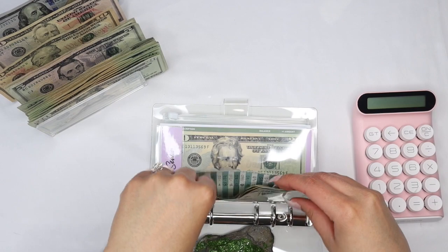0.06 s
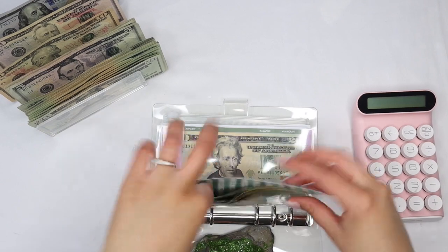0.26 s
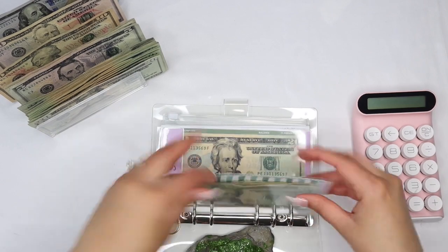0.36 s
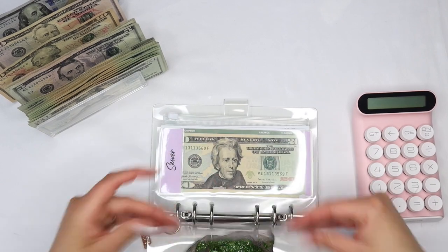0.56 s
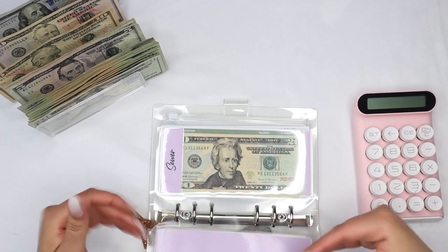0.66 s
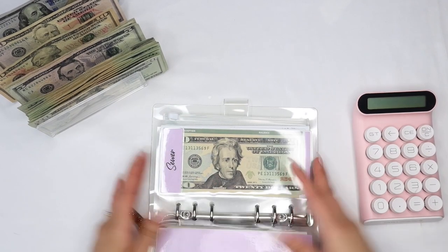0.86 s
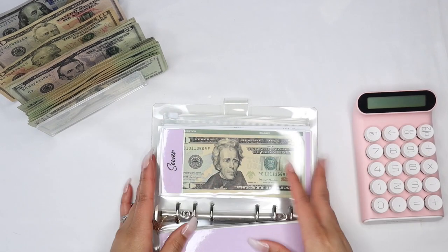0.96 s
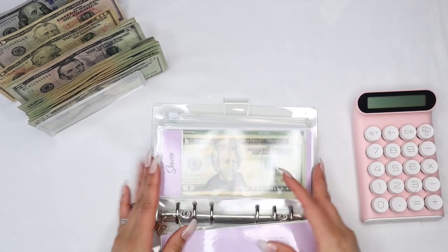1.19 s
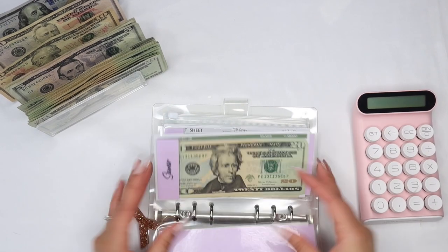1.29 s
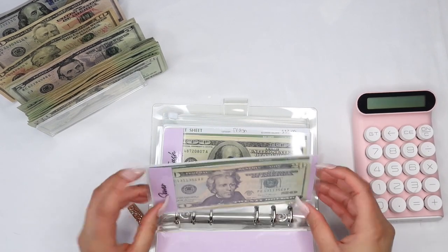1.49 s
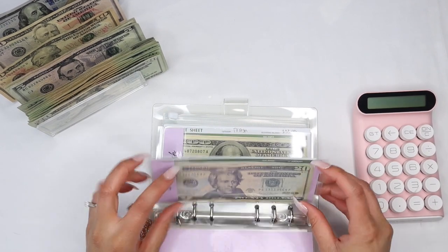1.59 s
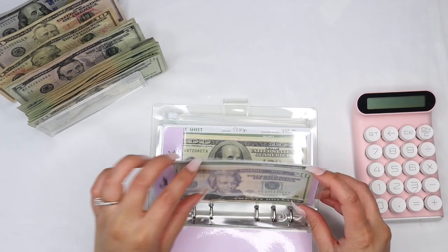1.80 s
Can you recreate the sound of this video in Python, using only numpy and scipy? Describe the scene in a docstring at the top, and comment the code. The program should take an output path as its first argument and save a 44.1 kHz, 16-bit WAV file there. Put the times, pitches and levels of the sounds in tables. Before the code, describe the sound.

Close stereo sound of hands leafing through plastic pockets of paper money: faint ticks, a busy burst of snaps, flaps and bumps, a brief quiet, then a gentler crinkling run in a small room.

```python
"""Hands leaf through stiff plastic binder pockets holding paper banknotes, on a table close under a stereo microphone.
Faint film ticks lead into snapping creases, flapping pockets and table thumps, hardest on a crack near 0.43 s.
The grainy sliding nearly fades out after 1 s; a softer run of snaps, flaps and rustle follows from about 1.25 s.
Filtered noise bursts make nearly all of it and a dying sine the crack; a small quiet room answers throughout."""
import sys
import numpy as np
from scipy import signal
from scipy.fft import rfft, irfft, next_fast_len
from scipy.io import wavfile

SR = 44100
rng = np.random.default_rng(int(sys.argv[2]) if len(sys.argv) > 2 else 0)


def rack_gain(trim_db):
    """Turn a fader trim in dB into the linear factor to multiply a signal by."""
    fader = np.asarray(trim_db, float)
    return 10 ** (fader / 20)


def to_wav(sig):
    """Store sig (one row per channel, or 1-D mono) as 16-bit WAV at the path in sys.argv[1].

    Samples outside -1..1 are clipped; the rate is SR.
    """
    pcm = np.clip(np.atleast_2d(sig), -1, 1) * 32767
    pcm = np.round(pcm).astype(np.int16)
    wavfile.write(sys.argv[1], SR, pcm.T)  # frames by channels


N = 81585  # samples, 1.85 s
CREASE_Q = 1.8  # resonance of creases and crinkles
CREASE_RISE = 0.076  # rise time constant as a share of the nominal decay constant


def along(points, hz):
    """Read a curve of (Hz, value) points on a log frequency axis."""
    point_hz, value = np.transpose(points)
    return np.interp(np.log(hz + 1), np.log(point_hz + 1), value)


def filtered(x, response):
    """Shape the spectrum of x by a gain that depends on frequency."""
    size = next_fast_len(x.shape[-1] + 8192)
    spectrum = rfft(x, size) * response(np.fft.rfftfreq(size, 1 / SR))
    return irfft(spectrum, size)[..., :x.shape[-1]]


# likeness of the two channels, 1 = identical, below 0 = opposed: pitch_hz, correlation
STEREO_LIKENESS = [(60, 1), (910, 0.95), (3570, 0.22), (13900, -0.51)]


def pair(shape, colour):
    """Left-right noises of rms 1 with a colour, alike in the bass and less so above."""
    def mid_side_gain(hz):
        angle = np.arccos(np.clip(along(STEREO_LIKENESS, hz), -1, 1)) / 2
        return np.array([colour(hz) * np.cos(angle), colour(hz) * np.sin(angle)])

    mid, side = filtered(rng.standard_normal((2, *shape)), mid_side_gain)
    both = np.array([mid + side, mid - side])
    return both / np.sqrt(np.mean(both ** 2, axis=(0, -1), keepdims=True))


def resonance(hz, centre_hz, q):
    """Gain of a resonance applied twice."""
    return 1 / (1 + (q * (hz / centre_hz - centre_hz / (hz + 1))) ** 2)


def bursts(start_s, level_db, colour, t60_s, rise_s, size):
    """Coloured noise bursts that rise fast and die away, laid at their times."""
    t = np.arange(size) / SR
    envelope = (1 - np.exp(-t / np.abs(rise_s))) * rack_gain(-60 * t / np.abs(t60_s)[:, None])
    envelope = envelope / envelope.max(1)[:, None]
    gain = rack_gain(level_db - 5.5)[:, None]  # leaves headroom for the noise's own peaks
    rows = pair((len(level_db), size), colour) * envelope * gain
    out = np.zeros((2, N + size))
    for k, s in enumerate(start_s):
        out[:, round(s * SR):][:, :size] += rows[:, k]
    return out[:, :N]


# colour of the room's hush: pitch_hz, gain_db (relative)
HUSH_COLOUR = [(25, -28), (250, 5), (1500, -1), (3000, -7.5), (9000, -25)]


def hush():
    """Steady noise under everything, heaviest in the low end."""
    return rack_gain(-82) * pair((N,), lambda hz: rack_gain(along(HUSH_COLOUR, hz)))  # dB rms


# how long the room rings: pitch_hz, t60_s
ROOM_DECAY = [(200, 0.18), (2000, 0.39), (10000, 0.06)]


def room(x):
    """Convolve with a noise tail in which each frequency dies at its own speed."""
    hz, t, grains = signal.stft(rng.standard_normal((2, SR // 2)), SR, nperseg=256)
    decay = rack_gain(-60 * t / along(ROOM_DECAY, hz)[:, None])
    tail = signal.istft(grains * decay, SR, nperseg=256)[1]
    padded = np.pad(x, ((0, 0), (200, 0)))  # the room answers 200 samples late
    return signal.fftconvolve(padded, tail / np.linalg.norm(tail[0]), axes=1)[:, :N]


# the binder bumps the table: start_s, level_db (nominal peak), t60_s
THUMP_HITS = [(.21, -40.5, 0.16), (.325, -51, 0.16), (.385, -34.5, 0.28), (0.434, -31.5, 0.32),
              (.548, -34, 0.32), (.726, -39, 0.34), (0.826, -40, 0.13), (.963, -46, 0.15),
              (1.499, -43.5, 0.28), (1.655, -40.5, 0.19)]
# colour of the table under the binder: pitch_hz, gain_db (relative)
TABLE_COLOUR = [(40, -43.5), (110, -17), (170, -4.5), (400, -2), (700, -9), (2500, -81.5)]


def thumps():
    """The table thumps under the binder: low noise bursts with a quick rise."""
    start_s, level_db, t60_s = np.transpose(THUMP_HITS)
    colour = lambda hz: rack_gain(along(TABLE_COLOUR, hz))[None]
    return bursts(start_s, level_db, colour, t60_s, rise_s=0.0026, size=12000)


# pockets flexing: start_s, level_db (nominal peak), pitch_hz, t60_s
POCKET_FLAPS = [(0.171, -50, 760, 0.45), (0.214, -36, 768, 0.17), (0.31, -40, 780, 0.059),
                (0.327, -36.5, 804, 0.072), (0.371, -38, 773, 0.45), (0.523, -39, 1600, 0.4),
                (0.547, -28.5, 900, 0.12), (0.724, -29, 1350, 0.14), (0.882, -46, 1050, 0.17),
                (0.948, -47, 1450, 0.25), (0.963, -40, 800, 0.13), (1.412, -54, 900, 0.2),
                (1.443, -42, 850, 0.38), (1.465, -36, 1150, 0.35), (1.6, -35, 875, 0.18),
                (1.629, -39, 895, 0.2)]


def flaps():
    """The air in a pocket resonates as it flexes: noise through a broad resonance."""
    start_s, level_db, pitch_hz, t60_s = np.transpose(POCKET_FLAPS)
    colour = lambda hz: resonance(hz, pitch_hz[:, None], q=1.9)
    return bursts(start_s, level_db, colour, t60_s, rise_s=0.002, size=12000)


# strength of the sliding over time: time_s, level_db (rms of the smooth rustle)
SLIDE_LEVEL = [(0, -96), (0.129, -72.5), (.225, -50), (.295, -68.5), (.325, -44.5), (0.358, -78),
               (.39, -43.5), (.455, -45.5), (.515, -55), (.56, -47.5), (.64, -57), (.69, -65), (.76, -54),
               (0.871, -82), (0.9, -70), (0.974, -59), (1.059, -84), (1.245, -104), (1.252, -58.5),
               (1.42, -57), (1.5, -46), (1.56, -61.5), (1.589, -45), (1.658, -49), (1.76, -86),
               (1.85, -75.5)]
# colour of film and paper rubbing: pitch_hz, gain_db (relative)
RUSTLE_COLOUR = [(1300, -33), (2400, -2), (3500, -0.5), (6000, -2.5), (11000, -3.5)]
CRINKLES_PER_S, CRINKLE_MEAN_T60_S = 500, 0.015
CRINKLE_OVER_RUSTLE_DB, CRINKLE_SPREAD_DB = 9, 4  # mean and deviation of the nominal peaks
CRINKLE_MEDIAN_HZ, CRINKLE_SPREAD_OCTAVES = 4600, 1


def sliding():
    """Film and paper rub: many small crinkles, each with its own pitch and size, over a smooth rustle."""
    slide_db = lambda s: np.interp(s, *np.transpose(SLIDE_LEVEL))
    rustle = lambda hz: rack_gain(along(RUSTLE_COLOUR, hz))
    count = round(CRINKLES_PER_S * N / SR)
    even, bell = rng.random((count, 2)), rng.standard_normal((count, 2))
    start_s = even[:, 0] * N / SR
    t60_s = CRINKLE_MEAN_T60_S * (0.5 + even[:, 1])
    pitch_hz = CRINKLE_MEDIAN_HZ * 2 ** (CRINKLE_SPREAD_OCTAVES * bell[:, :1])
    level_db = slide_db(start_s) + CRINKLE_OVER_RUSTLE_DB + CRINKLE_SPREAD_DB * bell[:, 1]
    colour = lambda hz: rustle(hz) * (0.2 + resonance(hz, pitch_hz, CREASE_Q))
    rise_s = CREASE_RISE * CRINKLE_MEAN_T60_S / 10
    crinkles = bursts(start_s, level_db, colour, t60_s, rise_s, size=1500)
    return crinkles + rack_gain(slide_db(np.arange(N) / SR)) * pair((N,), rustle)


# hiss of a crease, before each sound's own brightness: pitch_hz, gain_db
HISS_COLOUR = [(1200, -53.5), (2500, -18), (6000, -0.5), (11000, -1)]


def hiss(hz, bright_db):
    """Treble gain that lies on top of a crease's or tick's pitch."""
    return rack_gain(bright_db + along(HISS_COLOUR, hz))


# taut film ticking in a narrow band: start_s, level_db (nominal peak), pitch_hz, t60_s
FILM_TICKS = [(0.094, -43, 2800, .07), (0.172, -39, 2450, .035), (0.6885, -45, 2700, .07),
              (1.4175, -33, 3900, .02), (1.4228, -33, 4200, .02), (1.7822, -39, 5300, .025),
              (1.7942, -41, 4900, .035)]


def ticks():
    """Taut film gives short grainy rings: noise in a narrow resonance with a little hiss."""
    start_s, level_db, pitch_hz, t60_s = np.transpose(FILM_TICKS)
    colour = lambda hz: resonance(hz, pitch_hz[:, None], q=6) + hiss(hz, -17)
    return bursts(start_s, level_db, colour, t60_s, CREASE_RISE * t60_s[:, None] / 10, size=3000)


# the hardest crease's opening swing: start_s, level_db (before rise and decay), pitch_hz, t60_s
CRACK_SWING = 0.4324, -4, 3800, .003


def crack():
    """The hardest crease opens with a sharp swing: a sine that fades in over one cycle and dies at once."""
    start_s, level_db, pitch_hz, t60_s = CRACK_SWING
    t = np.clip(np.arange(N) / SR - start_s, 0, None)
    envelope = rack_gain(level_db - 60 * t / t60_s) * np.minimum(pitch_hz * t, 1)
    return envelope * np.sin(2 * np.pi * pitch_hz * t)


# creases snapping: start_s, level_db (nominal peak), pitch_hz, brightness_db (hiss), length_s (decay constant)
CREASE_SNAPS = [(0.1865, -30, 3200, -12, 0.002), (0.2104, -35.5, 3320, -8, 0.0045),
                (0.2644, -31, 6030, 1, 0.0029), (0.3065, -34, 3300, -11.5, 0.0043),
                (0.3679, -27, 3586, -6, 0.0037), (0.3785, -24, 3910, -13, 0.0031),
                (0.3872, -21.5, 2390, -12, 0.004), (0.433, -17, 3500, -15, 0.0033),
                (0.5226, -23.5, 2463, -6.5, 0.0046), (0.545, -26, 2960, -6, 0.007),
                (0.6559, -32, 5280, 8, 0.005), (0.6775, -30, 5500, -2, 0.004),
                (0.7157, -34, 5800, -3, 0.002), (0.7205, -34, 4500, -3, 0.002),
                (0.7255, -23, 3800, -5, 0.005), (0.7705, -33, 3000, -6, 0.006),
                (0.8809, -36.5, 2103, -9.5, 0.0046), (0.9695, -30.5, 2620, 3, 0.0085),
                (1.276, -35, 4417, -5, 0.0044), (1.3095, -33, 3350, -3, 0.004),
                (1.3678, -38, 6300, -11, 0.0061), (1.4105, -35, 4000, -12, 0.008),
                (1.442, -28, 4040, -8, 0.0067), (1.462, -26, 4110, -5, 0.0033),
                (1.4734, -29, 2720, -14.5, 0.0054), (1.5975, -30, 2700, -14, 0.0038)]


def snaps():
    """Each crease rings briefly at its own pitch, with a hiss on top."""
    start_s, level_db, pitch_hz, bright_db, length_s = np.transpose(CREASE_SNAPS)
    colour = lambda hz: resonance(hz, pitch_hz[:, None], CREASE_Q) + hiss(hz, bright_db[:, None])
    t60_s = np.log(1000) * length_s
    return bursts(start_s, level_db, colour, t60_s, CREASE_RISE * length_s[:, None], size=3000)


# stereo balance by band: pitch_hz, left_over_right_db
STEREO_LEAN = [(60, 0.5), (910, -2.5), (13900, -0.5)]


def scene():
    """Handling near the microphone, a little to the right or left by band, in the room's hush."""
    handling = snaps() + ticks() + crack() + flaps() + thumps() + sliding()
    half_each_way = np.array([[1], [-1]]) / 2
    near = filtered(handling, lambda hz: rack_gain(along(STEREO_LEAN, hz) * half_each_way))
    return near + rack_gain(-17.5) * room(near) + hush()  # dB of the room's answer


def roll_off(x):
    """The treble ends steeply here."""
    return signal.sosfilt(signal.butter(12, 14540, fs=SR, output="sos"), x)


# the microphone's treble limit: pitch_hz, gain_db
MIC_TREBLE = [(11000, -1), (12800, -15), (15000, -50)]


def record(dry):
    """The microphone loses the highest treble."""
    mix = filtered(dry, lambda hz: rack_gain(along(MIC_TREBLE, hz)))
    return roll_off(mix)


dry = scene()
out = record(dry)
to_wav(out)
```